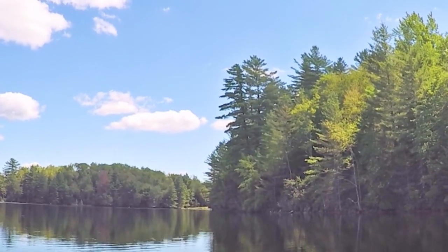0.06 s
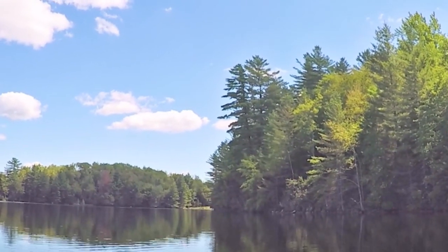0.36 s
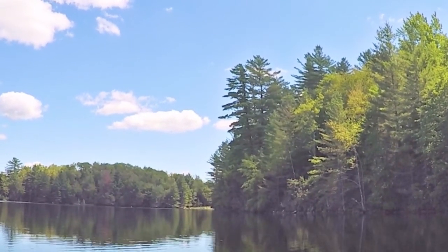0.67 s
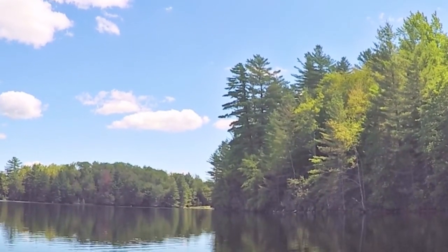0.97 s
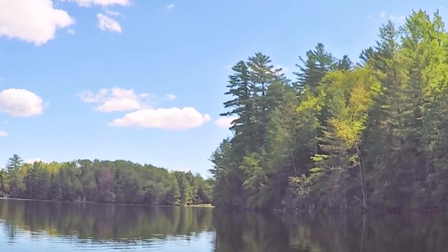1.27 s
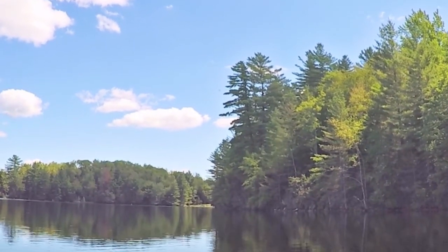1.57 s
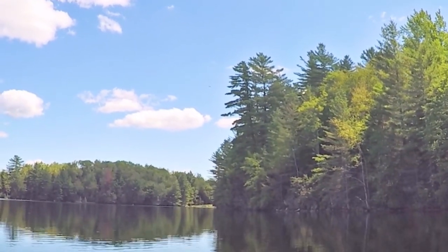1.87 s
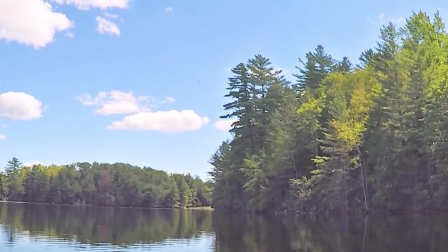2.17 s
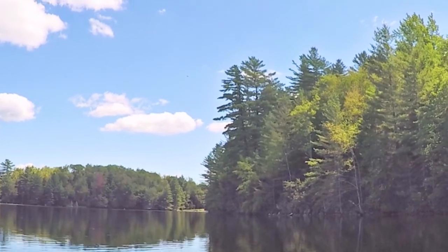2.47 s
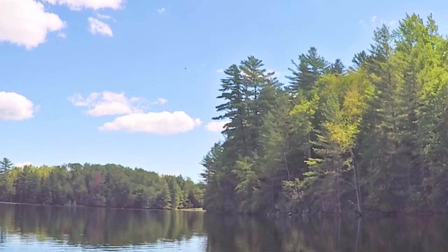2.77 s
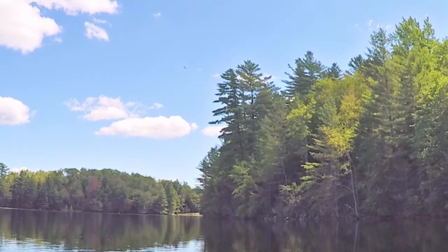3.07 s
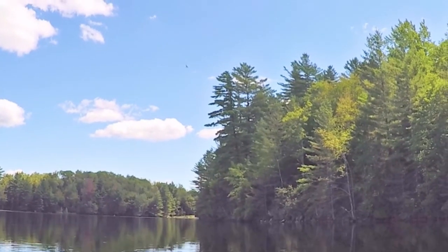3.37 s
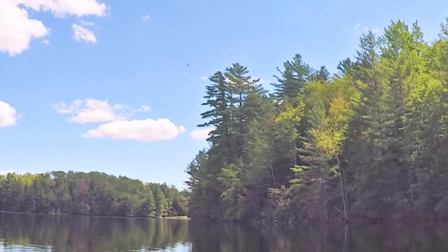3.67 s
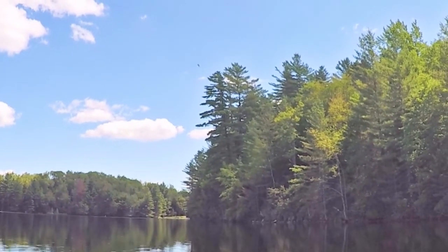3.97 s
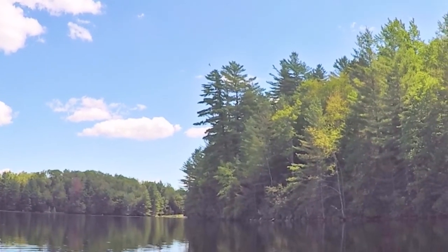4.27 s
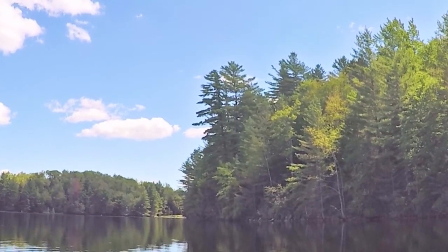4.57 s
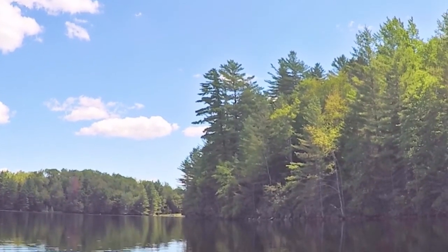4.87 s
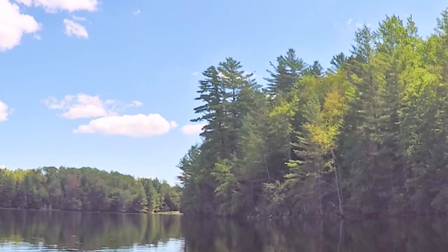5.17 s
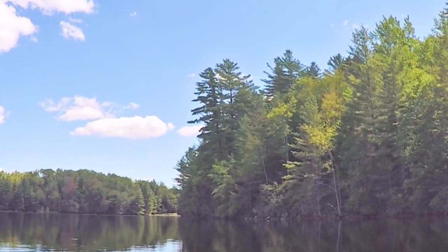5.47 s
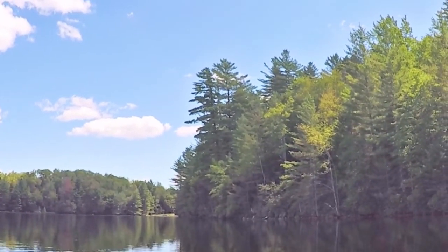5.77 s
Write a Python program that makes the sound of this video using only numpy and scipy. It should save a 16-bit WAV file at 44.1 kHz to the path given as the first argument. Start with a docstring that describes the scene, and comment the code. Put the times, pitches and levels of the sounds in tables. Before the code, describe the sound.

A bald eagle gives thin squeals and short creaky chirps across a calm lake, over low wind rumble on the microphone.

```python
"""Wind buffets the microphone over a soft airy hiss and a distant motor hum.
Then a bald eagle calls from the pines across a calm lake: three thin squeals, three chirps
that break into creaks, then a run of four. Its breath makes a membrane in the throat whistle,
and the voice creaks when it falls into slow pulses.
The woods ring after each note and the far shore sends a faint echo back."""
import sys
import numpy as np
from scipy import signal
from scipy.fft import rfft, irfft
from scipy.io import wavfile
from scipy.ndimage import uniform_filter1d

SR = 44100
rng = np.random.default_rng(int(sys.argv[2]) if len(sys.argv) > 2 else 0)


def transcribe(u):
    """Save the signal u as a 16-bit wav file named by the first command-line argument.

    u: samples, shape (n,) or (channels, n), limited to [-1, 1]; the rate is SR.
    q: integer samples, one column per channel.
    """
    v = np.clip(np.atleast_2d(u).T, -1, 1)
    q = np.round(v * 32767).astype(np.int16)
    wavfile.write(sys.argv[1], SR, q)


N = 265437  # about 6 seconds


def gain(db):
    """Turn decibels into a number to multiply by."""
    return 10 ** (np.asarray(db) / 20)


def unit_level(x):
    """Scale a sound so that its average level (rms) is 1."""
    return x / np.sqrt(np.mean(x ** 2))


def curve(rows):
    """Join (seconds, value) rows by straight lines."""
    return np.interp(np.arange(N) / SR, *np.transpose(rows))


def wander(count, hz):
    """A smooth random wiggle around zero, with spread 1, that moves about hz times a second."""
    freqs = np.arange(count + 1) * SR / (2 * count)
    spectrum = rfft(rng.standard_normal(2 * count))
    wiggle = irfft(spectrum / (1 + (freqs / hz) ** 4))[:count]
    return unit_level(wiggle - wiggle.mean())


def coloured_noise(rows):
    """Noise of level 1, with its lows and highs shaped by (Hz, dB) rows."""
    hz, db = np.transpose(rows)
    freqs = np.maximum(np.arange(N // 2 + 1) * SR / N, 1)
    shape = gain(np.interp(np.log(freqs), np.log(hz), db))
    return unit_level(irfft(rfft(rng.standard_normal(N)) * shape, N))


def add(out, start, x):
    """Mix x into out from a start time in seconds."""
    i = int(start * SR)
    out[i:i + len(x)] += x[:len(out) - i]


# The tone of the hiss. Each row: frequency in Hz, relative level in dB.
AIR_TONE = [(20, 6.5), (100, 16), (200, 6.5), (300, 5), (500, 1.5), (1000, -2), (2000, -4), (4000, -5.5),
            (6000, -8.5), (8000, -11.5), (12000, -14.5), (15000, -17)]

def air(level_db=-53.5, swell_db=0.33):
    """Open air and distant trees make an even hiss."""
    return coloured_noise(AIR_TONE) * gain(level_db + swell_db * wander(N, 0.25))


# How loud the motor is over time. Each row: time in seconds, level in dB.
MOTOR_LEVEL = [(0, -55.5), (1.0, -58.5), (1.3, -66), (3.5, -62.5), (6, -66.5)]
# The tones in its hum. Each row: multiple of the base pitch, relative level in dB.
MOTOR_TONES = [(2, -7), (3, -5), (4, -10.5), (5, -16.5)]

def motor(base_hz=59.1, drift=0.0065, waver_db=1.5):
    """A far engine hums, and each of its tones fades in and out over the water."""
    hz = base_hz * (1 + drift * wander(N, 1.83))
    phase = 2 * np.pi * np.cumsum(hz) / SR
    hum = sum(gain(db + waver_db * wander(N, 4.4)) * np.sin(round(multiple) * phase)
              for multiple, db in MOTOR_TONES)
    return np.sqrt(2) * gain(curve(MOTOR_LEVEL)) * hum


# The tone of the wind's rumble. Each row: frequency in Hz, relative level in dB.
WIND_TONE = [(10, -19.5), (22, -6.5), (33, 3.5), (45, -8), (60, -10.5), (80, -20.5), (120, -41), (200, -41),
             (500, -67), (5000, -105)]
# Gusts of wind. Each row: middle in seconds, length in seconds, level in dB.
WIND_GUSTS = [(0.016, 0.2, -39), (0.448, 0.094, -39.5), (0.856, 0.1, -34.5), (1.948, 0.31, -30.5),
              (2.17, 0.08, -34), (2.38, 0.27, -33), (2.617, 0.1, -35), (3.36, 0.083, -37),
              (3.675, 0.21, -35), (3.842, 0.12, -31), (3.962, 0.12, -36), (4.183, 0.19, -38),
              (4.42, .08, -35.5), (4.58, 0.1, -38.5), (4.954, 0.063, -37.5), (5.92, 0.66, -45.5)]

def wind(breeze_db=-47, puff_db=2.5, puff_hz=7, smooth_s=0.065):
    """Swirls of air push on the microphone: a puffy breeze, and gusts that swell and die away."""
    rumble = coloured_noise(WIND_TONE)
    even_rumble = rumble / np.sqrt(uniform_filter1d(rumble ** 2, int(smooth_s * SR)))
    t = np.arange(N) / SR
    power = gain(breeze_db + puff_db * wander(N, puff_hz)) ** 2
    for middle, length, db in WIND_GUSTS:
        swell = np.cos(np.pi * np.clip((t - middle) / length, -.5, .5))
        power += (gain(db) * swell) ** 2
    return even_rumble * np.sqrt(power)


# Single hard swirls of air. Each row: middle in seconds, pitch in Hz, peak level in dB.
WIND_THUMPS = [(1.911, 31.6, -21), (2.274, 51, -23.5), (3.73, 39.8, -22.5), (3.835, 44.8, -46),
               (3.967, 44, -26.5)]

def thumps(half_length_s=.08):
    """Each hard swirl thumps the microphone: one swing of pressure with a dip on both sides."""
    out = np.zeros(N)
    t = np.arange(-half_length_s, half_length_s, 1 / SR)
    for middle, hz, db in WIND_THUMPS:
        squared_time = (np.pi * hz * t) ** 2
        swing = (1 - 2 * squared_time) * np.exp(-squared_time)
        add(out, middle - half_length_s, gain(db) * swing)
    return out


def far_shore(call, delay_s=0.74, spread_s=0.13, echo_db=-31, dull_hz=3500):
    """The trees across the water send back a late, smeared and dull echo."""
    t = np.arange(2 * SR) / SR
    since_arrival = np.maximum(t - delay_s, 0) / spread_s
    swell = since_arrival * np.exp(-since_arrival)
    scatter = signal.sosfilt(signal.butter(4, dull_hz, fs=SR, output="sos"), rng.standard_normal(len(t)))
    echo = scatter * swell / np.linalg.norm(swell)
    return gain(echo_db) * signal.fftconvolve(call, echo)[:N]


# How much voice goes into the woods as the bird faces different ways.
# Each row: time in seconds, relative level in dB.
VOICE_INTO_WOODS = [(1.29, -7.5), (1.42, -1.5), (1.69, -2.3), (2.62, -12.5), (2.97, -13.5), (3.38, -15.5),
                    (4.4, -14), (4.68, -16.5), (4.88, -20)]

def woods(call, ring_s=1.06, build_s=0.003, dull_hz=3300, bank_s=.088, bank_db=-13):
    """Trunks scatter the call into a long tail, dulled by the needles; the bank adds a soft slap."""
    t = np.arange(2 * SR) / SR
    fade = np.exp(-np.log(1000) * t / ring_s)  # 60 dB down after ring_s
    tail = rng.standard_normal(len(t)) * (1 - np.exp(-t / build_s)) * fade
    tail /= np.linalg.norm(tail)
    tail[int(bank_s * SR)] += gain(bank_db)
    sent = call * gain(curve(VOICE_INTO_WOODS))
    dulled = signal.sosfilt(signal.butter(1, dull_hz, fs=SR, output="sos"), sent)
    return signal.fftconvolve(dulled, tail)[:N]


def creak(length, pulse_hz, throat_hz, width_hz, jitter=0.039, jitter_hz=350, leak_db=-24):
    """Uneven pulses ring the throat, which favours tones near throat_hz; the lowest also leak past."""
    n = int(length * SR)
    phase = 2 * np.pi * np.cumsum(pulse_hz * (1 + jitter * wander(n, jitter_hz))) / SR
    multiples = np.arange(1, 10)[:, None]
    throat = 1 / (1 + 2j * (multiples * pulse_hz - throat_hz) / width_hz) ** 2
    leak = gain(leak_db) / multiples ** 2
    voice = np.sum((throat + leak) * np.exp(1j * multiples * phase), axis=0).real
    return unit_level(voice) * np.sin(np.linspace(0, np.pi, n))


# Dry ticks as the voice stutters. Each row: middle in seconds, throat ring in Hz, level in dB.
VOICE_TICKS = [(1.278, 4700, -47.5), (1.676, 2720, -39.5), (2.657, 3340, -46.5), (2.673, 2200, -49),
               (2.7, 2950, -40.5), (2.717, 3120, -39), (3.005, 3300, -39.5), (3.026, 3130, -41.5),
               (3.040, 3250, -46), (3.048, 3100, -39.5), (3.437, 3270, -46)]
# Low croaks. Each row: middle in seconds, length in seconds, pulses per second,
# throat ring in Hz, level in dB.
VOICE_CROAKS = [ (1.272, 0.014, 870, 1750, -51), (1.377, 0.078, 618, 1940, -56),
                (1.673, 0.0093, 460, 1720, -44), (2.657, .017, 517, 1300, -51),
                (2.733, 0.025, 615, 1570, -50.5), (2.747, .016, 371, 915, -48.5),
                (2.750, .014, 594, 1750, -46), (3.055, .011, 963, 1450, -49), (3.073, .013, 905, 1470, -41),
                (3.079, .012, 620, 1319, -46), (3.435, 0.0088, 910, 1864, -48),
                (4.378, .016, 633, 1970, -49.5)]

def eagle_creaks(tick_s=.007, tick_pulse_hz=774):
    """The voice breaks into slow pulses: short high ticks and longer low croaks."""
    out = np.zeros(N)
    for middle, throat_hz, db in VOICE_TICKS:
        tick = creak(tick_s, tick_pulse_hz, throat_hz, width_hz=540)
        add(out, middle - tick_s / 2, gain(db) * tick)
    for middle, length, pulse_hz, throat_hz, db in VOICE_CROAKS:
        croak = creak(length, pulse_hz, throat_hz, width_hz=820, jitter=0.055)
        add(out, middle - length / 2, gain(db) * croak)
    return out


def whistle(length, pitch_hz, glide_hz, octave_db, rough,
            sag_hz_per_s=1870, rough_hz=450, strain_db=4.5, third_db=-44):
    """A membrane whistles as one push of air swells, bends the pitch in an arch and runs out."""
    n = int(length * SR)
    progress = np.linspace(0, 1, n)
    tension = wander(n, 74)  # the membrane's tightness moves both pitch and loudness
    sag_hz = sag_hz_per_s * length * (2 * progress - 1) ** 2  # longer notes droop more at both ends
    hz = (pitch_hz + glide_hz * (progress - .5) - sag_hz) * (1 + 0.011 * tension)
    shaky_hz = hz * (1 + 0.011 * rough * wander(n, rough_hz))
    phase = 2 * np.pi * np.cumsum(shaky_hz) / SR
    rise = np.sin(np.pi / 2 * np.minimum(progress / 0.25, 1))
    fall = 1 - progress ** 4.3
    flutter = 1 - 0.089 * tension + 0.83 * rough * wander(n, rough_hz)
    strain = np.clip((hz - hz.mean()) / hz.std(), -1, 2)  # brightest where the pitch is highest
    octave = gain(octave_db + strain_db * strain) * np.sin(2 * phase)
    third_harmonic = gain(third_db) * np.sin(3 * phase)
    return np.sqrt(2) * rise * fall * flutter * (np.sin(phase) + octave + third_harmonic)


# Where the throat rings during a rasp. Each row: frequency in Hz, relative level in dB.
RASP_RINGS = [(3250, 1), (2030, -6.5), (5450, -9.5)]
# The whistled notes. Each row: start in seconds, length in seconds, pitch in Hz, glide in Hz,
# level in dB, relative level of the octave above in dB, roughness (0 is smooth),
# strength of the opening rasp and strength of the rebound (both as fractions of the note).
EAGLE_NOTES = [ (1.282, .026, 3030, -10, -32, -31, .05, .03, 0.43),
               (1.269, 0.065, 2494, 50, -50, -17, 0.4, 0.1, 0),
               (1.345, 0.05, 2610, -170, -49, -24, 0.8, 0.1, 0),
               (1.403, .051, 2800, -88, -47, -18, 0.8, 0.3, 0.2),
               (1.418, 0.02, 2737, -30, -35.5, -32, .04, 0.04, 0),
               (1.680, 0.015, 2280, 30, -34, -13, 0.1, 0, 0.2),
               (1.683, 0.013, 3690, -48, -46.5, -32, 0, 0.06, 0),
               (2.616, .0185, 2628, 4, -28.5, -17.5, .02, 0, .38),
               (2.958, .0185, 2672, -4, -28, -25, .03, 0.06, 0.46),
               (3.363, 0.034, 2716, 86, -27, -24.5, 0.14, .15, 0),
               (3.399, 0.037, 2860, -100, -39, -27, .55, 0.2, 0),
               (4.318, 0.0089, 2003, 60, -44.5, -20, 0.42, 0.27, 0),
               (4.356, .026, 4620, -1400, -56, -26, .8, 0, 0.1),
               (4.379, 0.0055, 5200, 200, -40.5, -28, 0.2, 0.1, 0.1),
               (4.380, .02, 2840, 200, -28.3, -19.5, 0.06, .05, 0.1),
               (4.398, .009, 4320, 701, -50.5, -24, 1.1, 0, 0.1),
               (4.408, .012, 3555, -100, -33.5, -33, .24, 0.1, 0.15),
               (4.420, 0.021, 2800, -230, -29, -22.5, .02, 0, 0.04),
               (4.513, .042, 2832, 190, -24.2, -19, 0.05, .15, 0.39),
               (4.664, .047, 2828, 70, -24.8, -21, .05, .15, 0),
               (4.860, .047, 2728, -20, -25.2, -20.5, .04, .14, 0.2)]

def eagle_whistles(rasp_s=.011, rasp_lead_s=0.0023, break_s=.003, rebound_s=.012, rebound_drop=0.0092):
    """Each note may catch with a rasp, then whistles, and may rebound a little lower after a break."""
    out = np.zeros(N)
    for start, length, hz, glide_hz, db, octave_db, rough, rasp, rebound in EAGLE_NOTES:
        for throat_hz, throat_db in RASP_RINGS:
            catch = creak(rasp_s, pulse_hz=661, throat_hz=throat_hz, width_hz=620)
            add(out, start - rasp_lead_s, rasp * gain(db + throat_db) * catch)
        add(out, start, gain(db) * whistle(length, hz, glide_hz, octave_db, rough))
        again = whistle(rebound_s, hz * (1 - rebound_drop), glide_hz=-60, octave_db=octave_db, rough=rough)
        add(out, start + length + break_s, rebound * gain(db) * again)
    return out


def scene():
    """The eagle and its echoes sound over wind, hum and hiss, in one channel."""
    eagle = eagle_whistles() + eagle_creaks()
    echoes = woods(eagle) + far_shore(eagle)
    return (eagle + echoes + wind() + thumps() + motor() + air())[None]


def record(dry):
    """The recorder steeply cuts the highest treble, above 15250 Hz."""
    return signal.sosfilt(signal.ellip(12, .1, 90, 15250, fs=SR, output="sos"), dry)


dry = scene()
out = record(dry)
transcribe(out)
```